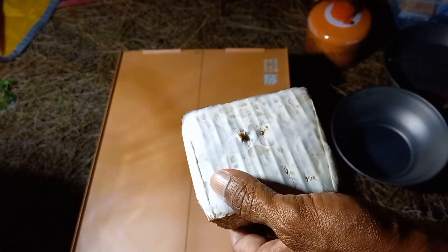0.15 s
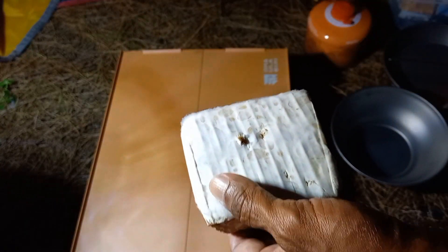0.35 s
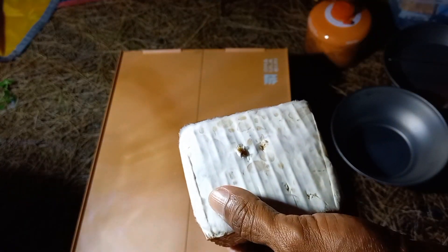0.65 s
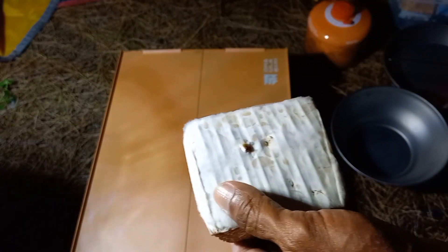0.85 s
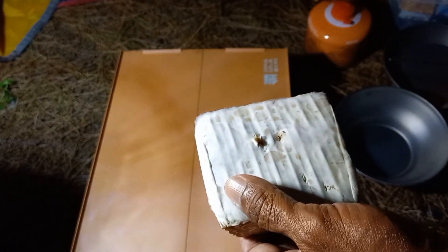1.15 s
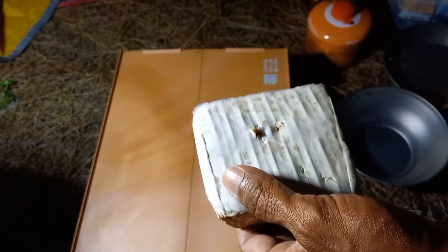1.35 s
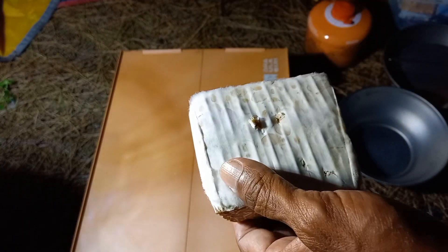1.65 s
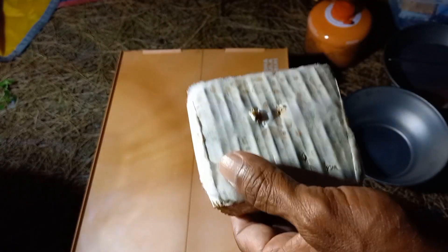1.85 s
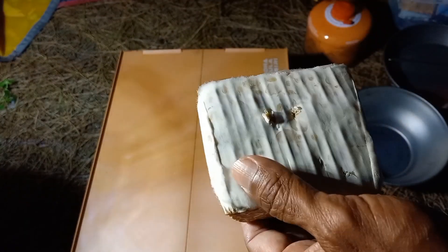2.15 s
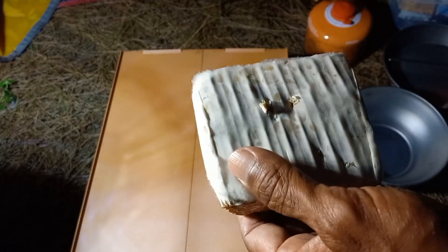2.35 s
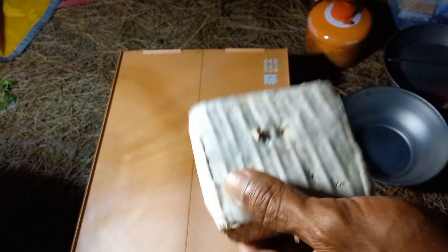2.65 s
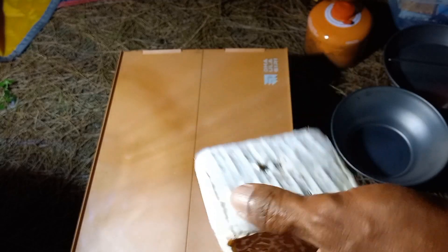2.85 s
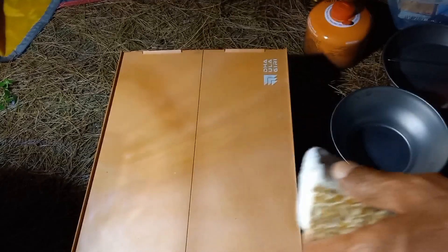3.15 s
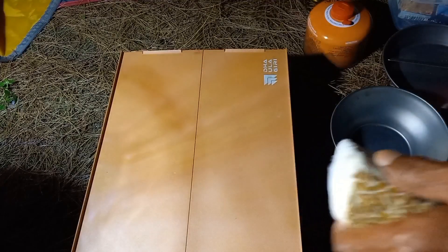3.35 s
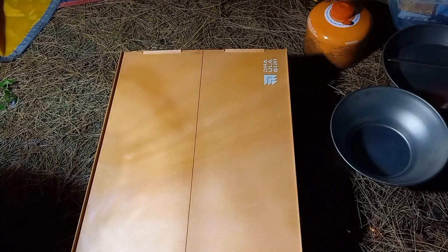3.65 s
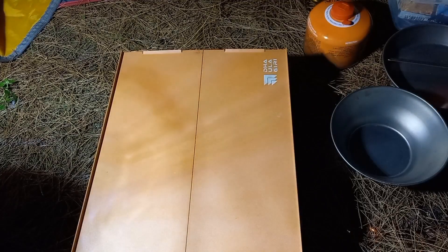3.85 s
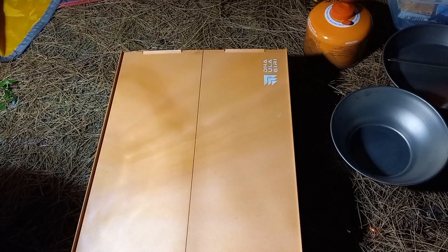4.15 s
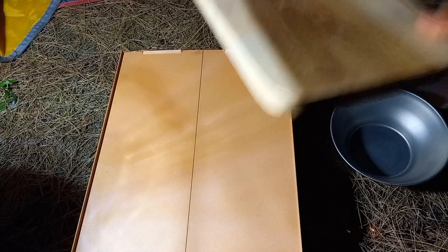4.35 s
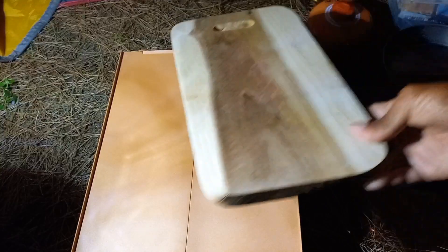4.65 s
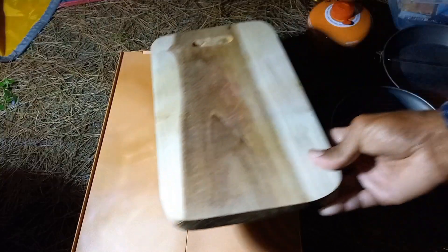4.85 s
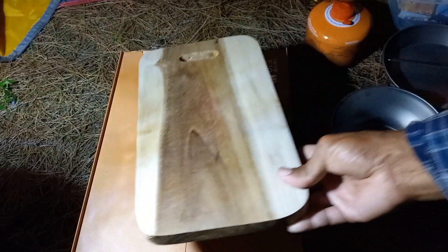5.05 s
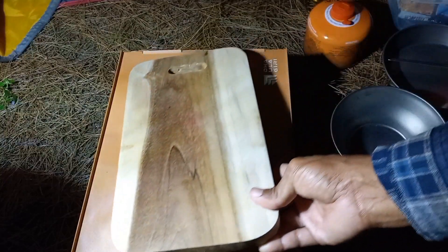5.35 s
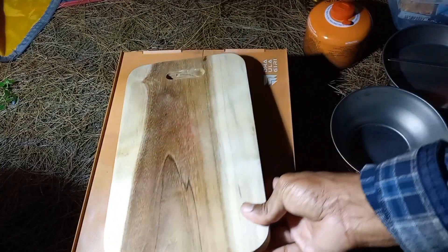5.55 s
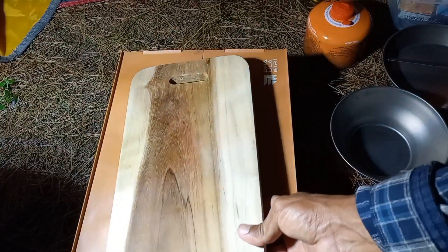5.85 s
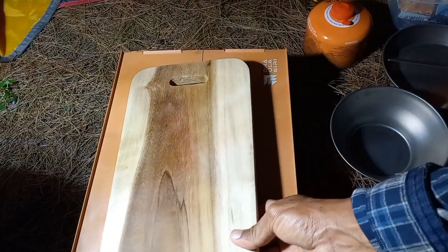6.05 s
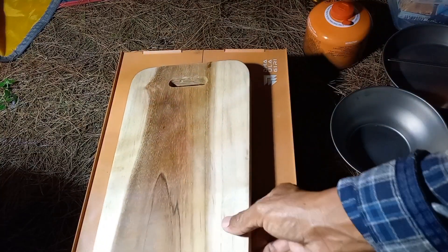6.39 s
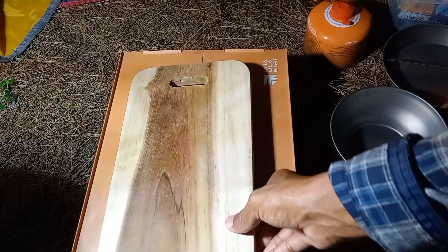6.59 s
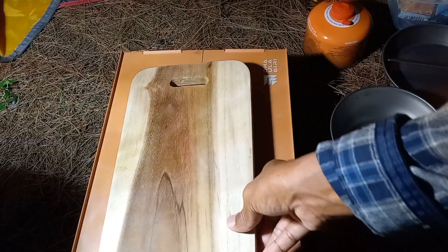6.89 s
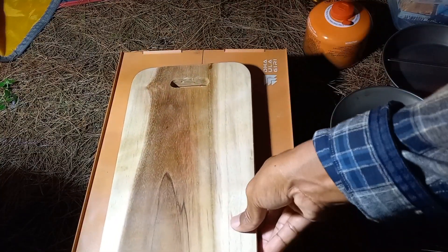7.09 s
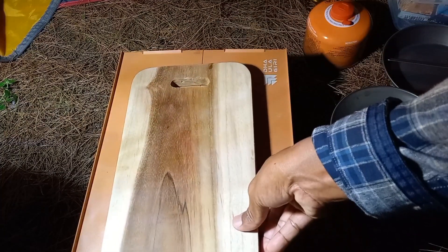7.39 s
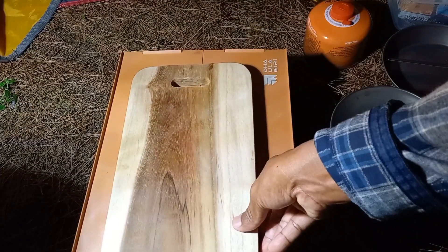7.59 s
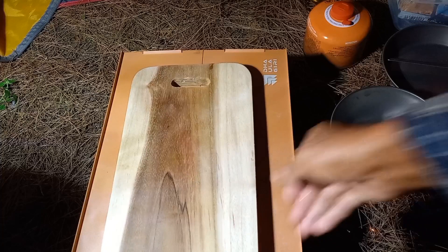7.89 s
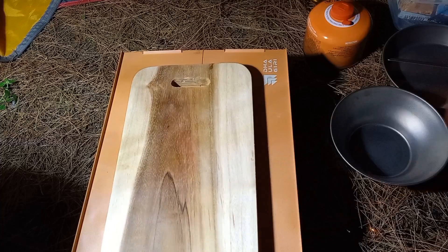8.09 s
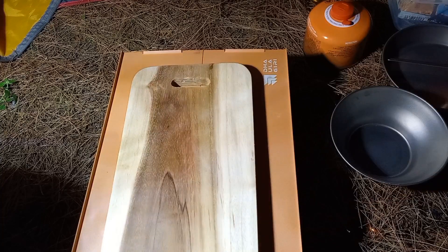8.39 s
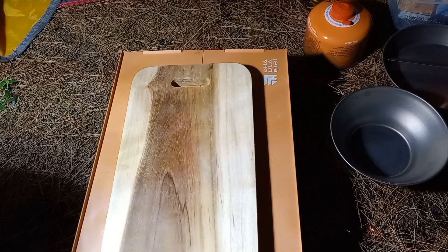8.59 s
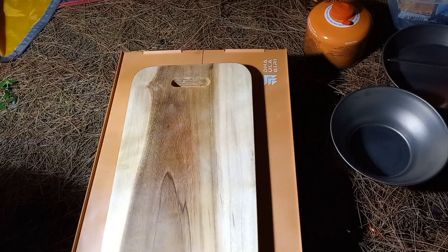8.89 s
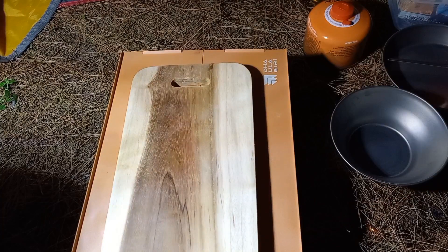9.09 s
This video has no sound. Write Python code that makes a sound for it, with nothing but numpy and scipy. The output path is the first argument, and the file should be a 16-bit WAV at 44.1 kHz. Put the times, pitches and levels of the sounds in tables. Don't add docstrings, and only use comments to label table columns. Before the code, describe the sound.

Close handling sounds outdoors at night: a bright pot clank, soft pats, cloth rustle, then a wooden board knocks and slaps flat amid crickets.

```python
import sys
import numpy as np
from scipy import signal
from scipy.fft import rfft, irfft, next_fast_len
from scipy.io import wavfile
from scipy.ndimage import uniform_filter1d, map_coordinates

SR = 44100
rng = np.random.default_rng(int(sys.argv[2]) if len(sys.argv) > 2 else 0)


def wav_record(signal):
    frames = np.transpose(np.atleast_2d(signal))
    bounded = np.clip(frames, -1, 1)
    quanta = np.round(bounded * 32767).astype(np.int16)
    wavfile.write(sys.argv[1], SR, quanta)


def natural_amplitude(level_db):
    exponent = np.asarray(level_db, float) / 20
    return 10 ** exponent


N = 407043


def unit(x):
    return x / np.sqrt(np.mean(x ** 2) + 1e-20)


def along(points, hz):
    f, v = np.transpose(points)
    return np.interp(np.log(hz + 1), np.log(f + 1), v)


def curves(rows):
    s, *columns = np.transpose(rows)
    return [np.interp(np.arange(N) / SR, s, column) for column in columns]


def wobble(rate):
    knots = rng.standard_normal(int(N * rate / SR) + 4)
    return map_coordinates(knots, [np.arange(N) * rate / SR])


def evenly(first, last, gap):
    return np.linspace(first, last, round((last - first) / gap) + 1)


def swells(rows, rise, fall):
    t = np.arange(0, N / SR, 1 / 1000)
    s, hold, db = np.transpose(rows)[..., None]
    before = np.clip(s - t, 0, None)
    after = np.clip(t - s - hold, 0, None)
    power = natural_amplitude(2 * (db - rise * before - fall * after)).sum(axis=0)
    return np.interp(np.arange(N) / SR, t, power)


# f/Hz, shared power fraction [1]
COHERENCE = [(60, 1), (300, 0.94), (700, 0.8), (1500, 0.59), (4000, 0.071)]


def rush(spectrum, lag):
    m = next_fast_len(N)
    hz = np.fft.rfftfreq(m, 1 / SR)
    shared, left, right = rfft(rng.standard_normal((3, m))) * natural_amplitude(along(spectrum, hz))
    alike = np.clip(along(COHERENCE, hz), 0, 1)
    late = np.exp(-2j * np.pi * hz * lag / SR)
    common = np.sqrt(alike) * shared * [late, late ** 0]
    separate = np.sqrt(1 - alike) * np.array([left, right])
    return unit(irfft(common + separate, m)[:, :N])


def add(out, s, x, pan_db, lag):
    for side, sign in enumerate((1, -1)):
        part = out[side, max(round(s * SR + sign * lag / 2), 0):][:len(x)]
        part += natural_amplitude(sign * pan_db / 2) * x[:len(part)]


def echoes(x, decay, wet_db):
    hz, t, z = signal.stft(rng.standard_normal((2, SR // 3)), SR, nperseg=256)
    tail = signal.istft(z * natural_amplitude(-60 * t / along(decay, hz)[:, None]), SR, nperseg=256)[1]
    return x + natural_amplitude(wet_db) * signal.fftconvolve(x, tail / np.linalg.norm(tail[0]), axes=1)[:, :N]


def stroke(from_hz, to_hz, length, third_db, rise):
    samples = int(length * SR)
    u = np.arange(samples) / samples
    cycles = length * (from_hz * u + (to_hz - from_hz) * u * u / 2)
    phase = 2 * np.pi * cycles + rng.uniform(0, 2 * np.pi)
    rough = unit(uniform_filter1d(rng.standard_normal(len(u)), size=60))
    swell = np.sin(np.pi * u ** rise) ** 1.3
    return unit(swell * (np.sin(phase) + natural_amplitude(third_db) * rough * np.sin(3 * phase)))


def crowd(shape, count):
    hz, db, t60 = np.transpose(shape)
    shift, damping = rng.random((2, count))
    place = np.interp(np.arange(count) + shift, [0, count], np.log(hz[[0, -1]]))
    decay = np.interp(place, np.log(hz), t60) * (.5 + damping)
    return np.transpose([np.exp(place), np.interp(place, np.log(hz), db), decay])


def ring(modes, attack, depth=.5, spread=1):
    hz, db, t60 = np.transpose(modes)[..., None]
    t60 = np.clip(t60, .005, .55)
    t = np.arange(int(t60.max() * SR)) / SR
    scatter, phase, beat, start = rng.random((4, len(modes), 1))
    twin = 1 + depth * np.sin(2 * np.pi * (30 * beat * t + start))
    decay = natural_amplitude(db + 3 * scatter - 60 * t / t60)
    x = (twin * decay * np.sin(2 * np.pi * (hz * t + spread * phase))).sum(axis=0)
    x *= 1 - np.exp(-t / attack)
    return x / np.abs(x).max()


# f/Hz, density level/dB
NIGHT_SPECTRUM = [(18, -63.5), (35, -33.5), (86, -1.5), (124, 0), (245, -7.5), (336, -14.5), (700, -26),
                  (1190, -33), (1810, -32.5), (2400, -45), (3600, -51.5), (5700, -48.5), (8000, -36),
                  (10500, -50), (16000, -43)]


def night():
    whine = natural_amplitude(-85.5 + 3 * wobble(3.3)) * np.sin(2 * np.pi * 1780 * np.arange(N) / SR)
    level = natural_amplitude(-51 + 0.2 * wobble(0.29)) * natural_amplitude([[-.4], [.4]])
    return level * rush(NIGHT_SPECTRUM, lag=14.5) + whine


def choir(from_hz, to_hz, length, count):
    beats = np.zeros((2, N))
    side, at, size = rng.random((count, 3)).T
    beats[(2 * side).astype(int), (N * at).astype(int)] = natural_amplitude(5.7 * size)
    one = stroke(from_hz, to_hz, length, third_db=-80, rise=0.67)
    out = signal.fftconvolve(beats, one[None], axes=1)[:, :N]
    return unit(echoes(out, [(5000, 0.21)], wet_db=-0.5))


# t/s, field choir level/dB, high choir level/dB, deep choir level/dB
CHORUS_LEVELS = [
    (0.0, -67.5, -74.5, -87.5),
    (3.85, -75, -89, -77),
    (4.39, -75.5, -81.5, -87),
    (7.81, -69, -79.5, -88),
    (8.2, -68.5, -72.5, -82),
    (9.23, -68, -78, -88),
]


def chorus():
    field_db, high_db, deep_db = curves(CHORUS_LEVELS)
    field = natural_amplitude(field_db) * choir(4850, 3700, 0.031, count=1000)
    small = natural_amplitude(-78.5) * choir(6200, 6900, .013, count=1500)
    deep = natural_amplitude(deep_db - 1) * choir(3050, 2710, 0.019, count=500)
    high = natural_amplitude(high_db) * choir(9300, 7920, 0.0041, count=2000)
    return field + small + deep + high


# t/s, hold/s, hiss level/dB, straw level over the hiss/dB
SLEEVE_RUBS = [(0, 0.082, -63, -3), (0.29, .01, -68, -13), (.555, .01, -70, -18), (0.628, .3, -77, 10),
               (1.184, 0.15, -67, 0), (1.445, 0.18, -76.5, -3), (1.727, .01, -66.5, -10),
               (1.824, 0.02785, -62.5, 2), (2.157, 0.16, -61, -2), (2.5, 0.14, -68, 1),
               (2.774, 0.018, -75, 10), (2.866, .02, -70, -4), (3.304, 0.066, -69.5, -4.5),
               (3.413, 0.32, -66, 1.5), (3.8, .5, -73.5, -9.5), (6.215, 0.11, -74, 3), (8.653, .3, -82, 2),
               (9.081, 0.011, -65, -15.5)]
CLOTH_FLICKS = [
    (8.04, .02, -66.5, -18),
    (8.09, .04, -60.5, -2),
    (8.17, .02, -65.5, 1),
    (8.27, 0.0054, -60, -6),
    (8.395, .03, -60.5, -3.5),
    (8.5, .04, -65.5, -4),
]
# t/s, hold/s, level/dB
CARD_SCRAPES = [(0, 0.05, -69), (.3, 0.021, -63), (.6, 0.0087, -87), (1.05, 0.011, -74),
                (1.22, 0.14, -66.5), (1.85, .01, -67), (2.2, 0.14, -63.5), (2.6, .01, -64.5),
                (2.8, .01, -63.5), (3.42, .13, -70), (3.68, .01, -59.5), (4, 0.0094, -65.5),
                (4.45, .01, -78), (5.45, 0.24, -66), (5.66, 0.12, -60.5), (6.3, 0.23, -61),
                (6.55, 0.0068, -61), (6.98, 0.011, -61), (7.72, .01, -67), (8.11, 0.066, -60),
                (8.27, 0.0084, -61.5), (8.4, 0.022, -57.5), (8.49, .05, -57.5), (9, 0.12, -68),
                (9.15, .01, -63)]


def rustle():
    # rows, rise and fall [dB/s]
    cloth = [(np.array(SLEEVE_RUBS), 140, 200), (np.array(CLOTH_FLICKS), 214, 270)]
    dragged = swells(CARD_SCRAPES, 120, 167)
    moved = sum(swells(rows[:, :3], rise, fall) for rows, rise, fall in cloth)
    stirred = sum(swells(rows[:, :3] + rows[:, 3:] * [0, 0, 1], rise, fall) for rows, rise, fall in cloth)
    grain = natural_amplitude(2.6 * wobble(60) + 1.5 * wobble(400))
    hiss = rush([(2500, -30), (4500, -6.5), (8000, -1.0), (12000, -1.5), (16000, -2.0)], lag=22)
    straw = rush([(1200, -35.0), (1680, 0.5), (2150, -5.5), (2680, -5.5), (3300, -8), (3900, -3.5),
                  (5500, -7.5), (9000, -53.0)], lag=16)
    scrape = rush([(400, -23.0), (495, -3), (700, -10.5), (950, 0), (1120, -1.0), (1300, -4.5),
                   (1800, -2.5), (2300, -11.0), (4000, -42.5)], lag=7.25)
    layers = natural_amplitude(6.0) * np.sqrt(moved + natural_amplitude(2 * -87)) * hiss
    layers += natural_amplitude(-2.5) * np.sqrt(dragged + natural_amplitude(2 * -75.5)) * scrape
    layers += natural_amplitude(2.0) * np.sqrt(stirred + natural_amplitude(2 * -15) * dragged + natural_amplitude(2 * -85)) * straw
    return natural_amplitude([[-1.5], [1.5]]) * unit(grain) * layers


# first t/s, last t/s, level over the effort/dB
TRILL_PHRASES = [(.035, .47, -4), (.085, .53, -4), (.816, .816, 0), (1.261, 2.352, -1.5),
                 (2.462, 4.014, -0.5), (4.634, 5.521, -1.5), (5.622, 6.397, -2), (6.512, 7.958, -2),
                 (6.23, 6.34, -7), (7.68, 7.9, -6.5), (8.14, 8.722, -5), (8.66, 8.77, -6.5),
                 (8.85, 9.181, -5), (8.9, 9.12, -10)]
# t/s, level/dB
TRILL_EFFORT = [(0, -66), (.5, -69), (1.3, -71.5), (1.9, -69), (2.25, -67), (2.9, -70), (3.25, -68.5),
                (3.65, -71.5), (3.9, -68), (4.63, -75), (4.8, -69), (5.4, -63), (6.05, -70.5), (6.3, -67),
                (6.9, -69.5), (7.8, -66), (8.2, -71), (8.5, -66)]
# t/s, left-right level/dB
TRILL_SHADOW = [
    (0.0, -0.5),
    (3.01, 0.5),
    (3.6, -7.5),
    (4.76, -1),
    (8.0, 2),
    (9.23, 0.5),
]


def trill_cricket():
    out = np.zeros((2, N))
    for first, last, db in TRILL_PHRASES:
        for s in evenly(first, last, .111):
            for k, scatter in enumerate(rng.standard_normal(size=4)):
                level = natural_amplitude(db + 1.5 + 0.32 * k + 1.2 * scatter)
                note = stroke(6680, 7280, 0.0165, third_db=-70, rise=0.65)
                add(out, s + .0172 * k, level * note, 0, lag=4.5)
    pan_db, effort_db = curves(TRILL_SHADOW)[0], curves(TRILL_EFFORT)[0]
    sides = natural_amplitude([effort_db + pan_db / 2, effort_db - pan_db / 2])
    return sides * echoes(out, [(7000, .07)], wet_db=-3)


def field_stroke(pitch, fall=0.94):
    return stroke((4560 + 660 * fall) * pitch, (4560 - 660 * fall) * pitch, 0.0245, third_db=-21, rise=.9)


# t/s, stroke gap/s, level/dB, left-right level/dB
THREE_STROKES = [
    (0.922, 0.032, -51, -1),
    (1.176, 0.032, -51.5, -2),
    (1.626, 0.034, -49, -4),
    (6.867, .035, -53.5, -1.5),
    (7.09, 0.033, -52.5, 0),
    (7.34, .034, -52.5, -0.5),
    (7.554, 0.032, -52, 0.5),
    (8.006, .033, -52.5, -7),
]
TWO_STROKES = [
    (0.714, .027, -48.5, 1),
    (1.419, .034, -52.5, 0),
    (7.799, .031, -54, 0.94),
]
# first t/s, last t/s, level/dB, left-right level/dB
FAR_BOUTS = [(.069, 0.34, -65.5, -1), (.821, .821, -64.5, -2), (1.876, 1.78, -66, 0),
             (2.143, 2.64, -70.5, 2), (3.094, 3.57, -70.5, -1.5), (3.856, 4.88, -66.5, -3.5),
             (5.13, 5.38, -69, -1), (6.153, 6.4, -74, 3), (6.646, 6.646, -68.5, 3), (6.969, 7.72, -67.5, 1),
             (8.182, 8.182, -68.5, 3), (8.3, 8.3, -70.5, -4), (8.428, 8.919, -69.5, -3),
             (9.041, 9.041, -77, 3)]


def field_cricket():
    out = np.zeros((2, N))
    for chirps, count in ((THREE_STROKES, 3), (TWO_STROKES, 2)):
        for s, gap, db, pan_db in chirps:
            for k, (size, pitch, turn) in enumerate(rng.standard_normal(size=(count, 3))):
                level = natural_amplitude(db - 2 * (k == 0) + 0.89 * size)
                note = field_stroke(1 + .0087 * pitch)
                add(out, s + gap * k, level * note, pan_db + 1.7 * turn, lag=-7.5)
    for first, last, db, pan_db in FAR_BOUTS:
        for s in evenly(first, last, .255):
            for k, scatter in enumerate(rng.standard_normal(size=3)):
                level = natural_amplitude(db + 1.0 + 1.4 * scatter)
                add(out, s + .0345 * k, level * field_stroke(1.01, fall=0.61), pan_db, lag=7.38)
    out = out + natural_amplitude(-7.5) * np.roll(out, round(.0024 * SR), axis=1)
    return echoes(natural_amplitude(-.3) * out, [(4500, .12)], wet_db=-8.5)


# t/s, peak level/dB, left-right level/dB
CLICKS = [
    (0.2394, -66, 4),
    (0.4494, -75, 11),
    (0.5544, -60.5, -0.5),
    (2.2647, -43, -3),
    (3.7085, -45.5, -4),
    (5.6237, -28, 6),
    (7.7194, -47.5, 1.5),
    (9.123, -54, 14),
]
# f/Hz, level/dB, t60/s
SNAP_MODES = [(710.6, -14, 0.019), (1050, 0.5, 0.035), (3157, -12.5, 0.054), (5500, -8, 0.025),
              (9700, -14.5, 0.017), (15490, -13.5, .035)]


def clicks(out):
    for s, db, pan_db in CLICKS:
        add(out, s, natural_amplitude(db) * ring(crowd(SNAP_MODES, count=110), 0.0009), pan_db, lag=13.35)


# t/s, peak level/dB
POT_NUDGES = [(0.263, -56), (0.287, -45.5), (0.317, -38.5), (1.666, -56), (1.714, -58), (1.759, -32.5),
              (1.818, -50), (1.839, -62), (2.14, -52.5), (8.189, -60), (8.389, -48), (8.479, -60.5)]
# f/Hz, level/dB, t60/s
HELD_POT_MODES = [(573, -11.5, 0.11), (925, -9, 0.13), (983.5, 3.5, 0.08), (1768, -8.5, 0.066),
                  (2700, -13, 0.073), (3820, -14, 0.05)]


def pot_nudges(out):
    for s, db in POT_NUDGES:
        add(out, s, natural_amplitude(db) * ring(HELD_POT_MODES, 0.0036, depth=.2), -1.5, lag=7.3)


def sings(peaks, slides, pan_db, lag):
    m = next_fast_len(N)
    f = np.fft.rfftfreq(m, 1 / SR)
    body = 0
    for k, (centre, width, db) in enumerate(peaks):
        resonance = 1j * f * width / (centre * centre - f * f + 1j * f * width)
        body = body + (-1) ** k * natural_amplitude(db) * resonance
    grain = unit(natural_amplitude(3.3 * wobble(90)))
    drive = np.sqrt(swells(slides, rise=740, fall=300)) * grain * rng.standard_normal(N)
    sung = irfft(rfft(drive, m) * body, m)[:N] / np.sqrt(np.mean(np.abs(body) ** 2))
    out = np.zeros((2, N))
    add(out, .001, sung, pan_db, lag)
    return out


# f/Hz, width/Hz, level/dB
POT_RESONANCES = [(971, 35, 0.5), (1313, 50, -8), (1677, 45, 1), (2000, 70, -8.5), (2630, 65, -2),
                  (3800, 88, -10.5)]
# t/s, hold/s, level/dB
POT_DRAGS = [
    (.3, .03, -64),
    (1.72, .03, -67),
    (1.81, 0.015, -56.5),
    (1.867, 0.017, -65),
    (2.13, .09, -59),
    (3.421, .2, -71.5),
    (8.394, 0.03, -54),
    (8.48, 0.057, -58.5),
]


def pot_slides():
    return sings(POT_RESONANCES, POT_DRAGS, pan_db=-1.5, lag=9.2)


# t/s, peak level/dB, left-right level/dB, left lag [samples]
POT_STRIKES = [
    (.645, -11, -7.5, -26),
    (0.6496, -11, 8, -19.5),
]
# f/Hz, level/dB, t60/s
BASE_MODES = [(564, -6, .11), (912, -1, .07), (986, 5, .065), (1194, -2, .13), (1672, 2, .05),
              (1789, -9, .07), (3835, 0, .04), (5100, -7, .03)]
# f/Hz, level/dB, t60/s
WALL_MODES = [(921, -1, .55), (1836, -16, .55), (2600, -11, .45), (3005, -14, .33), (2855, -12, .3),
              (3472, -13, .42), (4489, -14, .45), (4187, -11, .4), (5540, -15, .46), (6315, -22, .45),
              (7827, -16, .5), (8328, -19, .3), (11290, -26, .4), (12590, -21, .42)]
# f/Hz, level/dB, t60/s
SHEEN_MODES = [(1946, -8.5, 0.15), (3500, -12, .25), (5600, -11, 0.38), (7200, -11.5, .5),
               (8880, -8.5, 0.41), (12500, -11.5, .5), (15570, -14, 0.5)]


def pot_clank(out):
    for s, db, pan_db, lag in POT_STRIKES:
        add(out, s, natural_amplitude(db) * ring(BASE_MODES, 0.00065, depth=.15), pan_db, lag)
    s, db, pan_db, lag = POT_STRIKES[0]
    add(out, s, natural_amplitude(db - 13.5) * ring(WALL_MODES, 0.00099, depth=.3), pan_db, lag)
    add(out, s, natural_amplitude(db - 15) * ring(crowd(SHEEN_MODES, count=170), .001), pan_db, lag)
    add(out, s, natural_amplitude(db - 4.5) * ring(crowd(SNAP_MODES, count=90), 0.00029), pan_db, lag)


# t/s, peak level/dB
SOFT_PATS = [(1.185, -28), (1.335, -41), (2.134, -41), (2.252, -32), (2.266, -35.5), (2.323, -40),
             (2.499, -45), (2.588, -38), (2.766, -32), (2.784, -38), (3.59, -34), (3.623, -42),
             (3.654, -45.5), (6.46, -46.5), (6.97, -53), (6.992, -45)]
# f/Hz, level/dB, t60/s
SOFT_MODES = [(227.5, -3, 0.037), (400, -4.5, 0.051), (616, -2.5, 0.05), (970, -20, 0.066),
              (1582, -53, 0.056)]


def pats(out):
    for s, db in SOFT_PATS:
        add(out, s, natural_amplitude(db) * ring(crowd(SOFT_MODES, count=36), 0.0018, spread=0.32), -2.5, lag=11.6)


# t/s, peak level/dB, left-right level/dB
KNUCKLE_CLICKS = [
    (1.754, -34, 2),
    (8.1864, -43, -5),
    (8.3427, -34, -2),
]
# f/Hz, level/dB, t60/s
DULL_MODES = [(708, -10, .02), (990, -1, 0.028), (1400, -13, .02), (2190, -6, .025), (3100, -11, .02),
              (4600, -9, 0.022), (15500, -12.5, 0.018)]


def knuckles(out):
    for s, db, pan_db in KNUCKLE_CLICKS:
        add(out, s, natural_amplitude(db) * ring(crowd(DULL_MODES, count=90), 0.0009), pan_db, lag=13)


# t/s, f/Hz, level/dB
LOW_STRAND = [
    (4.03, 9500, -90),
    (4.1, 10800, -82),
    (4.155, 12000, -81),
    (4.185, 12050, -79),
    (4.21, 12400, -64),
    (4.25, 11850, -75),
    (4.3, 11900, -74),
    (4.325, 11000, -77),
    (4.35, 9600, -86),
]
HIGH_STRAND = [
    (4.02, 10800, -88),
    (4.065, 12200, -71),
    (4.11, 13700, -74),
    (4.17, 14500, -82),
    (4.2, 13500, -86),
    (4.22, 14500, -83),
    (4.255, 14000, -80),
    (4.295, 14150, -79),
    (4.32, 13300, -71),
    (4.355, 10600, -81),
]


def squeak():
    t, out = np.arange(N) / SR, np.zeros(N)
    for strand in (LOW_STRAND, HIGH_STRAND):
        hz, db = curves(strand)
        hz = uniform_filter1d(hz, size=500)
        sounding = (t > strand[0][0]) * (t < strand[-1][0])
        out += sounding * natural_amplitude(db + 3 * wobble(30)) * np.sin(2 * np.pi * np.cumsum(hz) / SR)
    return out


def ground_cricket():
    out = np.zeros((2, N))
    for k in range(6):
        for s in 4.645 + 0.06 * k + np.array([0, .016]):
            add(out, s, natural_amplitude(-70) * stroke(4350, 4100, .012, third_db=-70, rise=.8), 0, lag=9)
            add(out, s, natural_amplitude(-76) * stroke(9300, 8000, .013, third_db=-66.5, rise=.8), 0, lag=8.4)
    return echoes(out, [(5000, .08)], wet_db=-6)


# t/s, peak level/dB, left-right level/dB, left lag [samples]
EDGE_LANDINGS = [
    (5.403, -26, 1, -4.5),
    (5.447, -31, 0, 1.5),
    (5.64, -50, 7, -5),
    (5.789, -51, 8, 3),
]
# f/Hz, level/dB, t60/s
WOOD_MODES = [(407, -16, 0.19), (494.3, 4.5, 0.25), (618.5, -12.5, 0.14), (706, -10, 0.13), (925, -5, 0.21),
              (1050, -14.5, 0.17), (1290, -11.5, 0.33), (1780, -20, 0.094)]
# f/Hz, level/dB, t60/s
CARD_MODES = [(353, -28, 0.11), (452, -6, 0.16), (900, -5, 0.1), (1450, -9.5, 0.19), (2150, -10, 0.12),
              (2850, -15.5, 0.14), (5990, -24.5, 0.043)]


def board_edge(out):
    for s, db, pan_db, lag in EDGE_LANDINGS:
        add(out, s, natural_amplitude(db) * ring(WOOD_MODES, 0.0015, depth=.2), pan_db, lag)
        add(out, s, natural_amplitude(db - 16) * ring(crowd(CARD_MODES, count=40), .001), pan_db, lag)


# f/Hz, width/Hz, level/dB
BOARD_RESONANCES = [(496, 35, 4.5), (968, 23, 1.5), (1290, 35, -8.5), (1800, 83, -10), (2050, 97, -12),
                    (2480, 55, -13.5), (2710, 110, -12.5)]
# t/s, hold/s, level/dB
BOARD_DRAGS = [
    (5.5, 0.14, -62),
    (5.645, 0.041, -54),
    (5.72, 0.062, -56.5),
    (6.32, .2, -65.5),
]


def board_slides():
    return sings(BOARD_RESONANCES, BOARD_DRAGS, pan_db=4.0, lag=-3)


# t/s, peak level/dB, left-right level/dB, left lag [samples]
FLAT_LANDINGS = [
    (6.261, -18.5, 2.4, -2.5),
    (6.288, -31, 5, -8),
]
# f/Hz, level/dB, t60/s
FLAT_MODES = [(475, 0, 0.19), (635, -1, .07), (747, 0.5, 0.09), (973, -3, .09), (1068, -6, 0.19),
              (1109, -5.5, 0.094), (1295, -5, .1), (1403, -5, 0.13), (1465, 1, .07), (2020, -3.5, .075),
              (2104, -7.5, 0.086), (2250, -13.5, 0.11), (2455, -11, 0.085), (3300, -23, 0.08)]


def board_slap(out):
    for s, db, pan_db, lag in FLAT_LANDINGS:
        add(out, s, natural_amplitude(db - 1.5) * ring(FLAT_MODES, 0.00055, depth=0.4), pan_db, lag)
        add(out, s, natural_amplitude(db - 5.5) * ring(crowd(CARD_MODES, count=60), 0.00026), pan_db, lag)


def swish():
    start_s, hold_s = 8.06, 0.138
    level = np.sqrt(swells([(start_s, hold_s, -59)], rise=520, fall=500))
    late = np.clip((np.arange(N) / SR - start_s) / hold_s, 0, 1)
    band = lambda hz: rush([(.6 * hz, -30), (0.89 * hz, 0), (1.15 * hz, 0), (1.8 * hz, -30)], lag=18)
    return level * (np.sqrt(1 - late) * band(2850) + np.sqrt(late) * band(2000))


# f/Hz, width/Hz, level/dB
RIM_RESONANCES = [(7500, 200, -3), (8250, 180, 5), (8950, 200, -6), (11700, 300, -11)]
# t/s, hold/s, level/dB
RIM_BRUSHES = [
    (8.395, .012, -55),
    (8.42, .01, -71),
    (8.47, .05, -68),
    (8.56, .01, -76),
]


def rim_brush():
    return sings(RIM_RESONANCES, RIM_BRUSHES, pan_db=-2, lag=12)


# f/Hz, t60/s
TENT_DECAY = [(300, 0.16), (2000, 0.096), (10000, 0.057)]


def hands():
    out = np.zeros((2, N))
    for knock in (clicks, pot_nudges, pot_clank, pats, knuckles, board_edge, board_slap):
        knock(out)
    out = signal.sosfilt(signal.butter(2, 220, 'high', fs=SR, output='sos'), out)
    return echoes(out, TENT_DECAY, wet_db=-12)


def scene():
    crickets = chorus() + trill_cricket() + field_cricket() + ground_cricket()
    slides = pot_slides() + board_slides() + rim_brush()
    return night() + crickets + rustle() + hands() + slides + squeak() + swish()


def band_limit(x):
    return signal.sosfilt(signal.butter(12, 16480, fs=SR, output="sos"), x)


def record(dry):
    m = next_fast_len(N)
    gain = np.where(np.fft.rfftfreq(m, 1 / SR) < 15800, 1, natural_amplitude(-39.0))
    limited = irfft(rfft(dry, m) * gain, m)[:, :N]
    return band_limit(limited)


dry = scene()
out = record(dry)
wav_record(out)
```